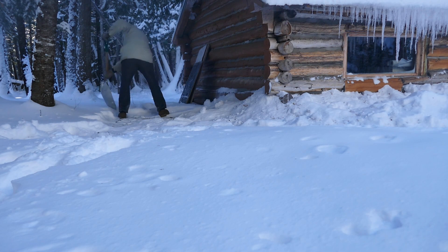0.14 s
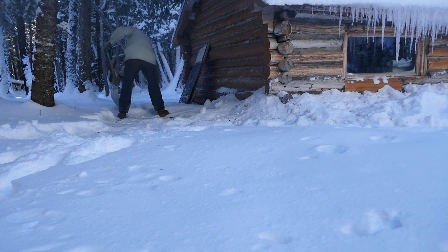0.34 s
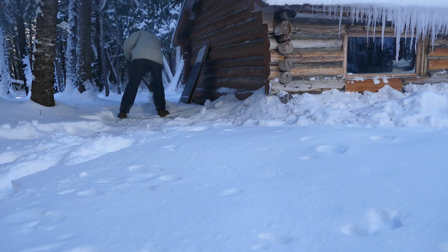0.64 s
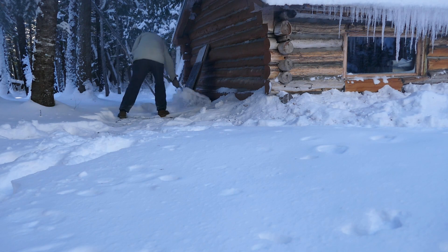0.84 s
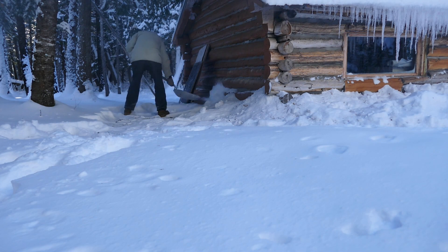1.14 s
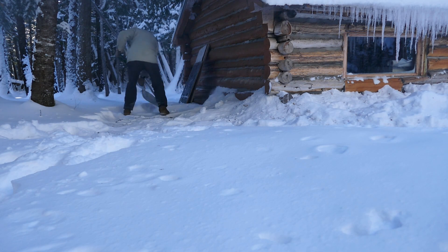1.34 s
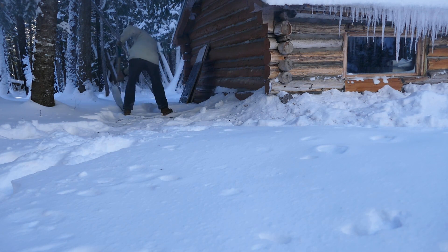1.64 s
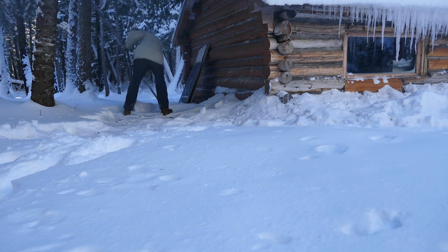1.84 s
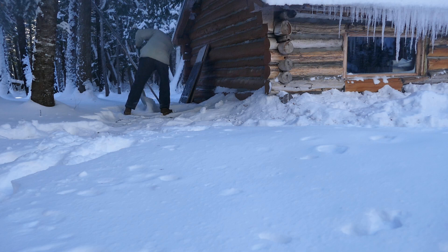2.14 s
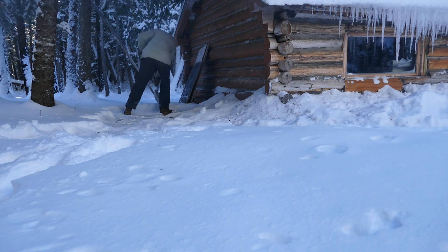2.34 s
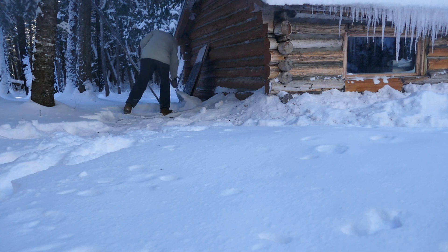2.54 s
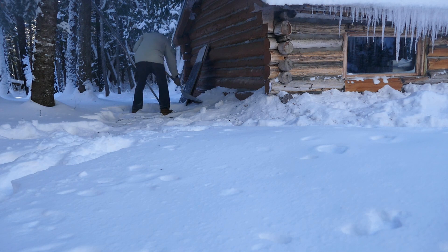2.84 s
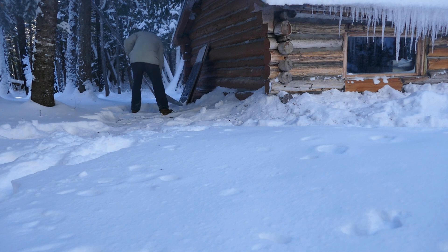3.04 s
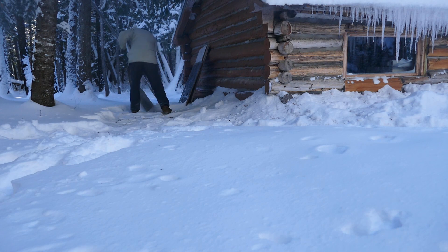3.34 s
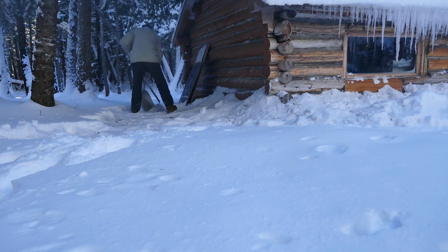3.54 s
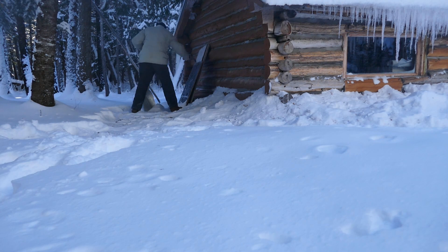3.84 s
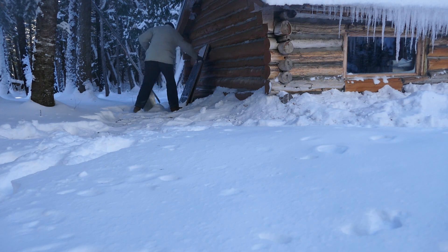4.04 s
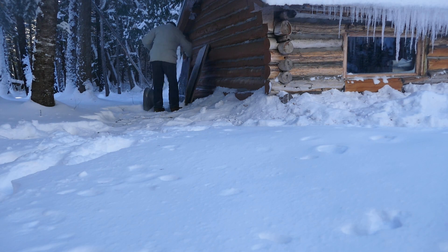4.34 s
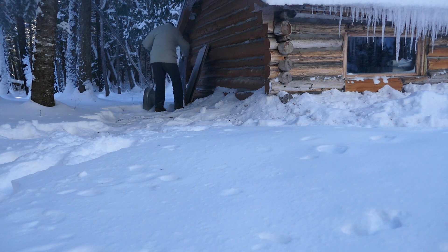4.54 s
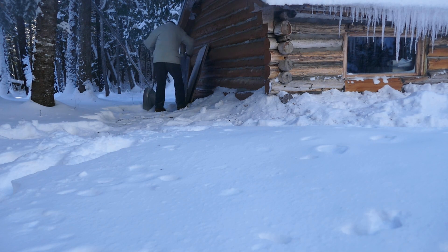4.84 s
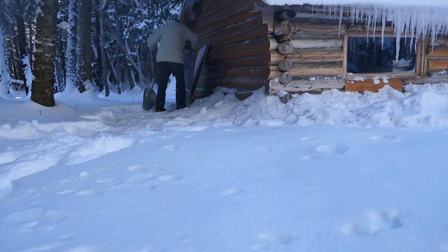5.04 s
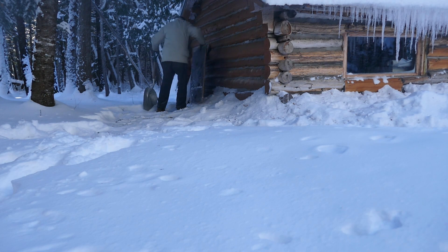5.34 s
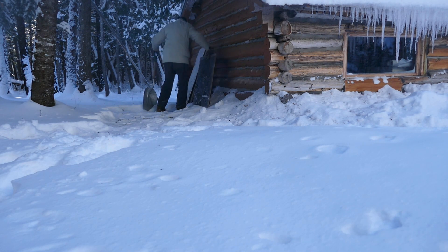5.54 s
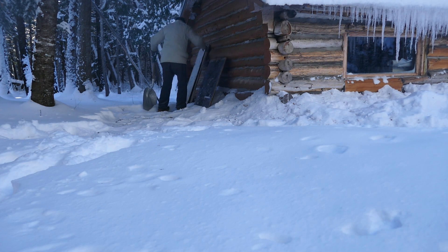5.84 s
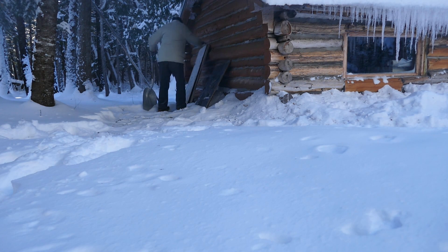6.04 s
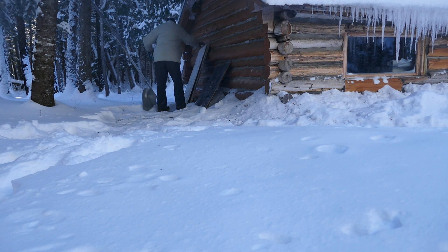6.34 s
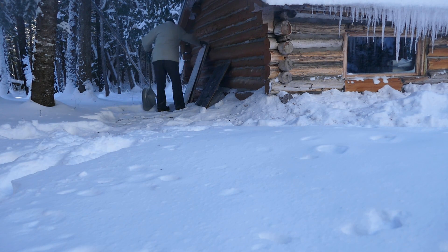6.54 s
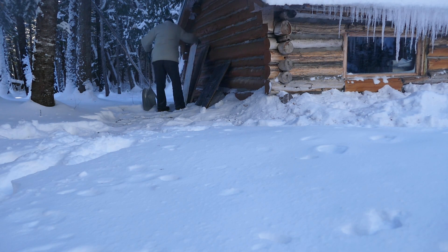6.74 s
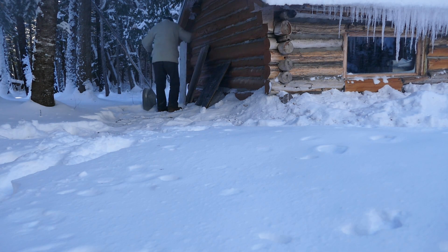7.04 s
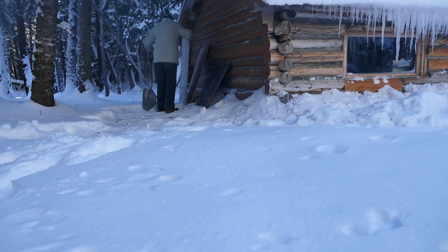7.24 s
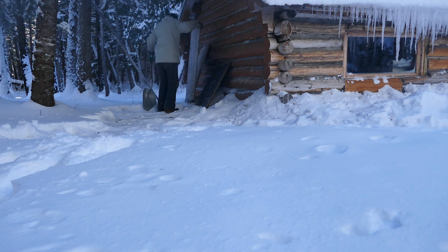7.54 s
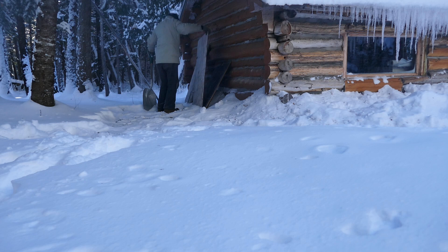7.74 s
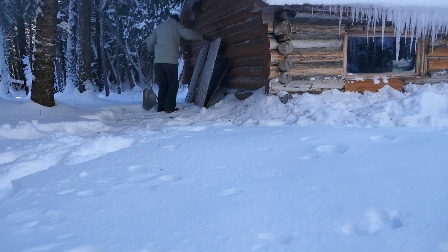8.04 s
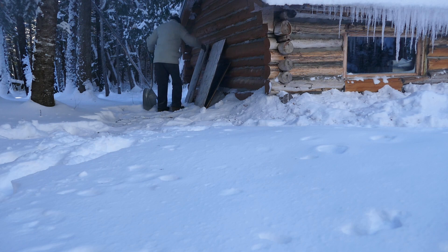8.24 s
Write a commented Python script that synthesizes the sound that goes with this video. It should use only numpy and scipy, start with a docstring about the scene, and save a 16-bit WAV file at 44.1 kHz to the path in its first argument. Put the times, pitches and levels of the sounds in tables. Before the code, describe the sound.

Outdoors in quiet snow, a metal shovel bites through dry crust with short crunching scrapes and powdery hisses, a few small cracks and soft thuds. The blade squeaks as snow weighs on it. Then leaning boards jerk free with woody knocks, one sharp loud crack, dragging scrapes and a final clatter. Close, dry, nearly centred sound over faint hiss.

```python
"""Shovelling snow and freeing boards

A metal shovel scoops and tosses dry cold snow beside a log cabin; then boards leaning on the wall are
pulled free of the crust, dragged and knocked about. Dense random grains, coloured by blade or board,
make the crunch; noise bursts make cracks, knocks and thuds; resonators ring as blade and boards.
Filtered noise lies under everything as a faint hiss and a narrow whirr."""
import sys
import numpy as np
from scipy import signal
from scipy.fft import rfft, irfft, next_fast_len
from scipy.io import wavfile

SR = 44100
rng = np.random.default_rng(int(sys.argv[2]) if len(sys.argv) > 2 else 0)


def waveform_to_disk(signal):
    """Save audio, clipped to [-1, 1], as 16-bit WAV at the path in sys.argv[1]."""
    frames = np.transpose(np.atleast_2d(signal))
    scaled = np.clip(frames, -1, 1) * 32767
    samples = np.round(scaled).astype(np.int16)
    wavfile.write(sys.argv[1], SR, samples)


N = 369558  # samples

# Four layers, always in this order: scrape, edge ring, powder hiss, packed-snow rumble.

# Background hiss colour. Each row: frequency in Hz, relative density in dB.
HISS_COLOUR = [(18, -57), (30, -19), (209, 3.5), (294, 3), (413, -39), (483, 4), (838, 1.5), (1010, -8.5),
               (1240, -28.5), (1340, 1.5), (2950, -13), (15800, -16.5)]
# Left-right likeness of the background. Each row: frequency in Hz, correlation from -1 to 1.
HISS_LIKENESS = [(60, -0.11), (240, -0.55), (950, 0.12), (3770, 0.055), (15000, 0.58)]
# Background whirr. Each row: centre in Hz, width of each of two passes in Hz, rms level in dB.
WHIRR_BANDS = [(499.3, 107, -63), (1050.6, 150, -67)]
# Sound arriving from the sides. Each row: frequency in Hz, level in dB re direct.
SIDE_COLOUR = [(60, -11.5), (150, -12.5), (380, -13), (950, -10), (2380, -34), (5980, -5.5), (15000, -7)]

# Colours of breaking snow. Each row: frequency in Hz, relative density in dB.
SNOW_SCRAPE = [(600, -16.5), (900, -24), (1300, -8), (1800, -4), (2300, 0), (2650, -2), (2950, -12),
               (3600, -15), (6000, -68.5)]
SNOW_EDGE = [(2300, -28.5), (2900, -13.5), (3500, -9), (4100, -8.5), (4600, -3.5), (5200, -12), (6300, -14),
             (8000, -20)]
SNOW_POWDER = [(3350, -5.5), (5700, 0), (6650, -2), (7920, -2.5), (10100, 2), (11900, -6.5), (14300, -9),
               (15800, -4.5)]
SNOW_RUMBLE = [(29, -45.5), (50, -23.5), (100, -12.5), (190, -9), (278, 1.5), (722, -2), (1000, -3.5),
               (1300, -67)]
# Colours of the boards. Each row: frequency in Hz, relative density in dB.
BOARD_SCRAPE = [(600, -6.5), (900, -20.5), (1300, -2.5), (1800, 1), (2300, 5.5), (2650, -1.5), (3000, -24),
                (3700, -43.5), (6000, -67.5)]
BOARD_EDGE_COLOUR = [(2300, -5), (2900, 1), (3700, -5.5), (4500, -5.5), (5300, -12.5), (6300, -22),
                     (8000, -50.5)]
BOARD_RUMBLE = [(29, -65.5), (60, -16.5), (151, -11.5), (231, -7), (370, -2.5), (500, -1), (700, -4),
                (1000, -1.5), (1300, -5.5), (1600, -75)]
SNOW_COLOURS = [SNOW_SCRAPE, SNOW_EDGE, SNOW_POWDER, SNOW_RUMBLE]
BOARD_COLOURS = [BOARD_SCRAPE, BOARD_EDGE_COLOUR, SNOW_POWDER, BOARD_RUMBLE]

# Resonances of blade and boards. Each row: frequency in Hz, width in Hz, relative level in dB.
BLADE_MODES = [(345, 28.6, -7), (700, 84, -9), (1803, 46, -16), (2362, 165, -5.5), (4210, 800, -10.5),
               (4586, 55.5, -8.5), (5115, 145, -10)]
BOARD_MODES = [(157.5, 11.5, -10.5), (376.4, 19, -11), (636, 31, -6), (983.5, 37, -18.5),
               (1251.3, 33, -16.5), (1577, 38, -20.5), (1747, 36.6, -18.5), (2178.4, 50.2, -7.5),
               (2344, 43, -19), (2492, 79, -10), (2724, 58, -19), (3261, 178, -6.5), (3735, 80, -11)]
# Sag and squeak of the upper blade ring as packed snow weighs on it; end values hold outside.
# Each row: time in seconds, pitch as a ratio, gain in dB.
BLADE_SAG_CURVE = [(4.16, 0.983, 0.5), (4.21, 1.06, 5), (4.25, 0.97, 8.5), (4.29, 0.894, 9),
                   (4.46, 0.86, 4.5), (4.581, 0.88, 5)]

# Soft landings in packed snow. Each row: start in seconds, relative scrape level in dB.
THUD_EVENTS = [(1.4116, -42), (3.2853, -46.5), (4.713, -44.5), (4.7787, -42)]
# Edge, powder and rumble of a thud, in dB re its scrape.
THUD_LAYERS_DB = (-4.5, -25, 4)
# Knocks and slips of the boards. Each row: start in seconds, relative scrape level in dB,
# edge and rumble in dB re scrape.
KNOCK_EVENTS = [(5.3929, -22, -25.5, -10), (5.3985, -12.5, -18.5, -24.5), (5.4172, -11, -4.5, -11.5),
                (5.4213, -17, -25.5, -12.5), (5.434, -14, -9.5, -14), (5.453, -19, -18, -9.5),
                (5.4796, -22, -5.5, -10.5), (5.4994, -16.5, -13, -25.5), (5.5065, -17.5, -29, -13),
                (5.557, -27.5, -24.5, -10), (5.6615, -19.5, -28, -18.5), (6.067, -8.5, -31, -12),
                (6.07, 0, -42.5, -19.5), (6.0728, -1, -42.5, -24), (6.0837, -5.5, -35.5, -14),
                (6.0983, -4.5, -25.5, -33), (6.122, -11.5, -26.5, -21), (6.129, -10.5, -33, -19.5),
                (6.146, -23, -29.5, -14), (6.1751, -18, -43, -33.5), (6.2439, -21, -18, -15.5),
                (6.3287, -22, -7.5, -25), (6.7565, -25, -3, -20.5), (7.8251, -19.5, -2, -26),
                (7.849, -26, -1.5, -22.5), (7.87, -28.5, 1.5, -13.5), (7.878, -21, -8.5, -2.5),
                (7.9063, -13.5, -4, -16.5), (7.9093, -14.5, 1.5, -27.5), (7.926, -23.5, 8.5, -15),
                (7.9307, -30, 10.5, -24.5), (7.9402, -23, 12.5, -24.5), (7.9518, -25.5, 9.5, -30.5),
                (7.969, -23, 2.5, -25.5), (7.997, -27.5, 1.5, -19), (8.0274, -27.5, 2, -18.5),
                (8.0842, -22.5, -7, -24.5), (8.167, -29, 2.5, -29.5), (8.262, -9, 0.5, -23.5),
                (8.2684, -18.5, -6, -13), (8.274, -14.5, 7.5, -11), (8.296, -11.5, -11.5, -21),
                (8.313, -17.5, 0.5, -33), (8.325, -18.5, 2, -18), (8.345, -22.5, -8.5, -23)]
# Crust cracking at the blade or underfoot. Each row: start in seconds, relative scrape level in dB,
# edge, powder and rumble in dB re scrape.
CRACK_EVENTS = [(0.5357, -20, -1.5, -4, -28), (1.559, -45.5, 2.5, 7, -17.5),
                (2.2588, -21, -2.5, -8.5, -18.5), (2.453, -33, 9.5, -15, -21),
                (2.468, -31, 6.5, -16.5, -25), (2.525, -22, -4, -15, -37), (2.7545, -25.5, -4, -37.5, -35),
                (3.882, -35, 10.5, 6, -21), (3.923, -15.5, -1, -21.5, -13), (3.949, -27.5, 10, -11.5, -5),
                (3.958, -28, 9.5, -12.5, -18), (4.0627, -35.5, 0.5, -14, -11),
                (4.132, -22, 8.5, -32.5, -11), (4.231, -41.5, -9.5, -26, 12.5),
                (4.249, -40, 4.5, -26.5, -15), (4.33, -26.5, -4.5, -32.5, -7),
                (4.3921, -33.5, 5.5, -16.5, 2.5), (4.5096, -24, -15.5, -26.5, -11.5),
                (4.555, -34.5, -13.5, -26, -17), (4.607, -31.5, -14, -26, -10.5),
                (4.8904, -38.5, 10.5, -25, -12.5), (4.988, -40.5, 13, -26, -17), (5.0114, -45.5, 12, -9, 1),
                (5.032, -44, 7.5, 12, -11), (5.07, -46, 11.5, -17.5, -4.5), (6.2176, -30, -6.5, -9, -13.5),
                (7.0745, -34, 5, 8, -22.5), (7.559, -25, -2.5, 1.5, -15), (7.5848, -40, 0.5, 3, -5.5),
                (7.657, -35.5, -1.5, -9.5, -9.5)]
# Short flat swishes. Columns as for cracks.
SWISH_EVENTS = [(0.165, -51.5, -2, -13.5, -20.5), (5.915, -50.5, 2, -1.5, -15),
                (6.327, -35, -3.5, -12, -12), (6.5842, -39.5, 2.5, -13, -18.5)]
# Pitch of the contact snap in the four layers, in Hz.
CONTACT_HZ = (2252, 3965, 3470, 900)

# Boards jolted free and dragged. Each row: start, peak and end in seconds, scrape drive at peak in dB,
# entry and exit in dB re peak before the layer shares, edge, powder and rumble in dB re scrape.
DRAG_STROKES = [(5.384, 5.40, 6.005, -32.5, 6.5, -34, -8, -20.5, -5),
                (5.5, 5.56, 7.14, -46.5, -34.5, -13, -13, -15, -5.5),
                (5.82, 5.98, 5.98, -47.5, -16, 3, -30.5, -26.5, -16),
                (6.072, 6.09, 6.096, -23, -2, 1.5, -23, -38, -22),
                (6.116, 6.135, 6.51, -36.5, -7.5, -19, -13, -18, -6.5),
                (6.72, 6.79, 7.253, -41.5, -18, -6.5, -2.5, -14, -12.5),
                (7.2, 7.345, 7.46, -51, -27, -12.5, 5.5, -14.5, -3.5),
                (7.5, 7.7, 7.85, -64.5, -39, 1.5, -2, -4, -9),
                (7.865, 7.9, 8.22, -32, 3, -23.5, -2.5, -21.5, -11.5),
                (8.02, 8.07, 8.48, -51, 8.5, -2.5, -5.5, -18, -9),
                (8.261, 8.285, 8.496, -34, 14.5, -11.5, -2, -20.5, -9)]
# Shovel strokes through the snow. Columns as for drags.
SCOOP_STROKES = [(0.0, 0.2, 0.292, -63.5, -21, 3.5, -9.5, -4, -13),
                 (0.33, 0.51, 0.588, -38.5, -29, -4, 0, -4, -24),
                 (0.55, 0.63, 0.884, -41, -3, -19, 1.5, 4, -14),
                 (0.915, 1.13, 1.1576, -46.5, -9.5, 0, 3.5, 3.5, -22),
                 (1.17, 1.22, 1.458, -55, -4.5, -18, -10.5, -3.5, -8),
                 (1.55, 1.68, 1.73, -56.5, 0, 0, -6.5, -6, -20.5),
                 (1.74, 1.89, 2.1153, -31.5, -30.5, -23.5, 0, -14, -16),
                 (2.07, 2.36, 2.691, -36.5, -19.5, -23, 0.5, -10, -14.5),
                 (2.72, 2.98, 2.966, -46.5, -10, 5.5, 1, -1, -15.5),
                 (3.28, 3.32, 3.42, -65, 4, 1, -0.5, -2, -21),
                 (3.47, 3.6, 3.775, -35, -7.5, -25.5, -3, -7, -13),
                 (3.64, 3.78, 3.86, -43, -4, -4, -1, -8, -10.5),
                 (3.84, 3.94, 3.942, -46, -9, 2, -2, -12, -10),
                 (3.97, 4.08, 4.264, -48.5, -7.5, -5.5, -2.5, -10, -7.5),
                 (4.16, 4.56, 4.735, -42.5, -5.5, -3.5, -5, -20, -9.5),
                 (4.69, 4.95, 5.215, -54.5, -2, -9, -14.5, -11.5, -9.5)]
# Share of swell and fade taken by the four layers, as a ratio.
DRAG_SHARES = (1.142, 1.197, 0.83, 0.983)
SCOOP_SHARES = (1.043, 1.153, 0.76, 1.03)
# Lag of the four layers, in seconds.
DRAG_LAYER_LAGS_S = (0.0068, 0.00136, 0.0184, 0.005)
SCOOP_LAYER_LAGS_S = (0, 0.004, .015, .05)
# Faint creak of snow underfoot throughout: drive of the four layers in dB.
CREAK_DB = (-69, -71.5, -81, -74.5)

HISS_DB = -59
CUTOFF_HZ = 15800
TAPS = 4096
FRAME, HOP = 1024, 128  # samples
DRAG_ENTRY_S, DRAG_EXIT_S, DRAG_BEND = 0.0124, 0.01, 0.65
SCOOP_ENTRY_S, SCOOP_EXIT_S, SCOOP_BEND = 0.0429, 0.0595, 1.113
EDGE_FADE_DB = 21.5  # depth of the quick fade at either end of a stroke
SWELL_BEND = 1.723  # a swell rises fast, then rounds off
THUD_DULL_HZ = 523  # soft contact leaves little rumble above this
LOW_SLOWER = 2.23  # time stretch of the rumble of a blow
POWDER_SLOWER = 1.45  # stretch of the powder's build-up
KNOCK_POWDER_DB = -23  # snow shaken loose by a knock, re scrape


def from_db(db):
    """Decibels to gain."""
    return 10 ** (np.asarray(db) / 20)


def rms_one(x):
    """Scale to rms 1."""
    return x / np.sqrt(np.mean(x ** 2) + 1e-20)


def at_hz(points, size):
    """Read a (Hz, value) table at every FFT bin, on a log frequency axis."""
    hz, value = np.transpose(points)
    bins_hz = np.arange(size // 2 + 1) * SR / size
    return np.interp(np.log(bins_hz + 1), np.log(hz), value)


def coloured(x, spectrum):
    """Minimum-phase filter, falling away below its first point; white noise keeps its rms."""
    bins_hz = np.arange(TAPS // 2 + 1) * SR / TAPS
    below = np.minimum((bins_hz + 1) / spectrum[0][0], 1) ** 3
    magnitude = rms_one(from_db(at_hz(spectrum, size=TAPS)) * below)
    cepstrum = irfft(np.log(magnitude))
    cepstrum[1:TAPS // 2] *= 2  # folding gives the minimum phase
    response = irfft(np.exp(rfft(cepstrum[:TAPS // 2], TAPS)))
    return signal.oaconvolve(np.atleast_2d(x), response[None], axes=1)[:, :N]


def coloured_sum(drives, colours):
    """Sum of the four layers, each through its colour."""
    return sum(coloured(x, colour)[0] for x, colour in zip(drives, colours))


def drift(rate_hz):
    """Random wander of rms 1 from twice-smoothed noise, computed at every 16th sample."""
    r = np.exp(-32 * np.pi * rate_hz / SR)
    noise = rng.standard_normal(N // 16 + 2002)
    slow = signal.lfilter([1], [1, -2 * r, r * r], noise)[2000:]
    return np.interp(np.arange(N) / 16, np.arange(len(slow)), rms_one(slow))


def resonance(x, hz, width_hz):
    """Two-pole peak of gain 1."""
    r = np.exp(-np.pi * width_hz / SR)
    poles = [1, -2 * r * np.cos(2 * np.pi * hz / SR), r * r]
    return signal.lfilter([(1 - r * r) / 2, 0, (r * r - 1) / 2], poles, x)


def bending(x, hz, width_hz):
    """Resonance whose centre follows a pitch curve: shift to zero, smooth, shift back."""
    r = np.exp(-np.pi * width_hz / SR)
    turn = np.exp(2j * np.pi * np.cumsum(hz) / SR)
    return 2 * np.real(signal.lfilter([1 - r], [1, -r], x / turn) * turn)


def background():
    """Steady noise hiss and a narrow wavering whirr, only partly alike in the two channels."""
    size = next_fast_len(N)
    mid, side = rfft(rng.standard_normal((2, size)))
    alike = np.clip(at_hz(HISS_LIKENESS, size=size), -1, 1)
    spectra = np.sqrt(1 + alike) * mid + np.sqrt(1 - alike) * side * [[1], [-1]]
    air = irfft(spectra, size)[:, :N]
    hiss = from_db(HISS_DB) * rms_one(coloured(air, HISS_COLOUR))
    whirr = 0
    for hz, width_hz, db in WHIRR_BANDS:
        band = resonance(resonance(air, hz, width_hz), hz, width_hz)
        whirr = whirr + from_db(db) * rms_one(band)
    return hiss + whirr


def scattered(x, decay_s):
    """Ever-changing diffuse side return: set magnitude, phase of a noise falling 60 dB in decay_s."""
    tail = rfft(rng.standard_normal(TAPS) * from_db(-60 * np.arange(TAPS) / SR / decay_s))
    response = irfft(np.exp(1j * np.angle(tail)) * from_db(at_hz(SIDE_COLOUR, size=TAPS)))
    return signal.oaconvolve(x * drift(51.3), response)[:N]


def blows(table, trim_db, length_s, square, snap):
    """Bursts of crackle with a fainter tail; a higher square holds them flat and ends them sharply."""
    size = int(.2 * SR)
    out = np.zeros((4, N + SR))
    t = np.arange(size) / SR / np.array([[1], [1], [1], [LOW_SLOWER]])
    attack = np.minimum(t / 0.0021 / [[1], [1], [POWDER_SLOWER], [1]], 1)
    tail = from_db(-25.5) * np.exp(-t / 0.0228)
    envelope = (np.exp(-(t / length_s) ** square) + tail) * attack
    cycles = np.outer(CONTACT_HZ, np.arange(24)) / SR
    contact = snap * np.hanning(24) * np.sin(2 * np.pi * cycles)
    for (start_s, db, *rest_db), crackle in zip(table, rng.standard_normal((len(table), size))):
        at = round(start_s * SR)
        burst = crackle * envelope
        burst[:, 50:74] += contact
        gains = from_db(db + trim_db + np.array([0, *rest_db]))
        out[:, at:at + size] += gains[:, None] * burst
    return out[:, :N]


def thuds():
    """Soft landings in packed snow: longer, duller bursts without a contact snap."""
    events = [(*row, *THUD_LAYERS_DB) for row in THUD_EVENTS]
    drive = blows(events, trim_db=-8.5, length_s=0.00645, square=0.82, snap=0)
    rumble = signal.sosfilt(signal.butter(2, THUD_DULL_HZ, fs=SR, output="sos"), drive[3])
    return coloured_sum([*drive[:3], rumble], SNOW_COLOURS)


def grains(per_s, spread_db):
    """Random clicks of uneven size and sign: crystals snapping."""
    sizes = from_db(spread_db * np.minimum(rng.exponential(1, N), 5)) * rng.choice([-1, 1], N)
    return sizes * (rng.random(N) < per_s / SR)


def strokes(table, entry_s, exit_s, bend, shares, lags_s):
    """Each stroke bites in, swells to its peak, fades and lets go: gains of the four layers."""
    power = np.zeros((4, N))
    for start, peak, end, db, entry_db, exit_db, *rest_db in table:
        first, last = max(round(start * SR), 0), round((end + exit_s + max(lags_s)) * SR)
        t = np.arange(N)[first:last] / SR
        for layer, (own_db, share, lag_s) in enumerate(zip([0, *rest_db], shares, lags_s)):
            late = t - lag_s
            swell_db = entry_db * np.clip((peak - late) / (peak - start), 0, 1) ** SWELL_BEND
            fade_db = exit_db * np.clip((late - peak) / (end - peak), 0, 1) ** bend
            ends = np.clip(1 - (t - start) / entry_s, 0, 1) + np.clip((late - end) / exit_s, 0, 1)
            level_db = db + own_db + share * (swell_db + fade_db) - EDGE_FADE_DB * ends
            power[layer, np.round(t * SR).astype(int)] += from_db(level_db) ** 2
    return np.sqrt(power)


def crunch(stroke):
    """Crystals snap in clumps under the stroke: drives of the four layers."""
    clumps = from_db(1.49 * drift(12.4) + 0.367 * drift(55.0))
    snaps = grains(6000, 0.62) * clumps
    dust = grains(14000, 0.59) * clumps ** 0.57
    lumps = grains(700, 1.18) * clumps
    scrape = snaps * from_db(0.214 * drift(15.8))
    edge = snaps * from_db(0.313 * drift(21.0))
    return stroke * [rms_one(x) for x in (scrape, edge, dust, lumps)]


def layer_at(hz):
    """Index of the layer whose range holds this pitch: rumble, scrape or edge."""
    return 3 if hz < 900 else 0 if hz < 3000 else 1


def crumbs(stroke, level_db, cycles):
    """Larger lumps break now and then, each ringing one of 24 brief pitches."""
    snaps, dealt, out = grains(400, 2.6), rng.integers(0, 24, N), np.zeros(N)
    for k, hz in enumerate(np.geomspace(240, 5200, 24)):
        ring = resonance(snaps * (dealt == k) + 1e-18, hz, hz / cycles)
        out += stroke[layer_at(hz)] * rms_one(ring)
    return from_db(level_db) * out


def shifting_colour(x, depth_db, width_hz, hold_s):
    """Snow loads the body unevenly: narrow patches of the spectrum swell and sink at random."""
    parts = signal.stft(x, SR, nperseg=FRAME, noverlap=FRAME - HOP)[2]
    field = rng.standard_normal(parts.shape)
    span = np.arange(-40, 41)
    for axis, step in enumerate((width_hz * FRAME / SR, hold_s * SR / HOP)):
        kernel = np.expand_dims(np.exp(-(span / step) ** 2), 1 - axis)
        field = signal.oaconvolve(field, kernel, "same", axes=axis)
    gains = rms_one(from_db(depth_db * rms_one(field)))
    return signal.istft(parts * gains, SR, nperseg=FRAME, noverlap=FRAME - HOP)[1][:N]


def sounded(rubbing, struck, colours, modes, rub_db, sag=None):
    """Rubbing and blows go through their colours and also set the body's modes ringing."""
    out = shifting_colour(coloured_sum(rubbing, colours), depth_db=2.6, width_hz=70, hold_s=.02)
    out += from_db(-2.0) * coloured_sum(struck, colours)
    ringing = struck + from_db(rub_db) * rubbing
    for hz, width_hz, db in modes:
        # grip and load change which modes speak
        drive = ringing[layer_at(hz)] * from_db(db + 2.8 * drift(25.0))
        if sag is not None and hz > 3000:
            pitch, squeak_db = sag
            ring = bending(drive * from_db(squeak_db), hz * pitch, width_hz)
        else:
            ring = resonance(drive, hz, width_hz)
        out += ring * np.sqrt(SR / np.pi / width_hz)  # narrow peaks pass less noise
    return out


def boards():
    """Boards dragged through crust and knocked: grains and bursts excite the wood's resonances."""
    events = [(s, db, edge_db, KNOCK_POWDER_DB, rumble_db) for s, db, edge_db, rumble_db in KNOCK_EVENTS]
    knocks = blows(events, trim_db=-9.5, length_s=0.0017, square=0.576, snap=1.881)
    drags = strokes(DRAG_STROKES, DRAG_ENTRY_S, DRAG_EXIT_S, DRAG_BEND, DRAG_SHARES, DRAG_LAYER_LAGS_S)
    body = sounded(crunch(drags), knocks, BOARD_COLOURS, BOARD_MODES, rub_db=-12.5)
    return body + crumbs(drags, level_db=-24, cycles=11.3)


def shovel():
    """Blade through snow: grains, swishes and crust cracks excite the metal's resonances."""
    cracks = blows(CRACK_EVENTS, trim_db=-7.0, length_s=0.00396, square=0.653, snap=0.944)
    swishes = blows(SWISH_EVENTS, trim_db=-7.0, length_s=.038, square=5, snap=0)
    scoops = strokes(SCOOP_STROKES, SCOOP_ENTRY_S, SCOOP_EXIT_S, SCOOP_BEND, SCOOP_SHARES,
                     SCOOP_LAYER_LAGS_S)
    scoops += from_db(CREAK_DB)[:, None]
    sag_s, *columns = np.transpose(BLADE_SAG_CURVE)
    sag = [np.interp(np.arange(N) / SR, sag_s, column) for column in columns]
    body = sounded(crunch(scoops) + swishes, cracks, SNOW_COLOURS, BLADE_MODES, rub_db=-11.0, sag=sag)
    return body + crumbs(scoops, level_db=-20.0, cycles=45)


def scene():
    """The work is straight ahead; scatter of opposite sign left and right widens it."""
    work = thuds() + boards() + shovel()
    return work + scattered(work, decay_s=0.00885) * [[1], [-1]] + background()


def record(dry):
    """Steep low-pass: the top is cut."""
    return signal.sosfilt(signal.cheby2(14, 70, CUTOFF_HZ + 250, fs=SR, output="sos"), dry)


dry = scene()
out = record(dry)
waveform_to_disk(out)
```